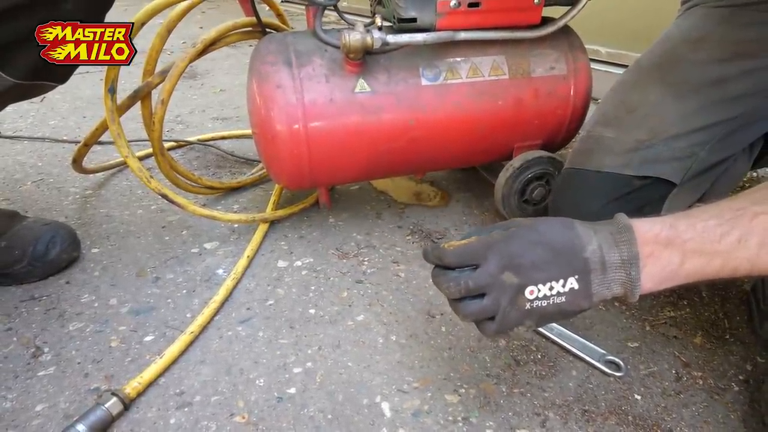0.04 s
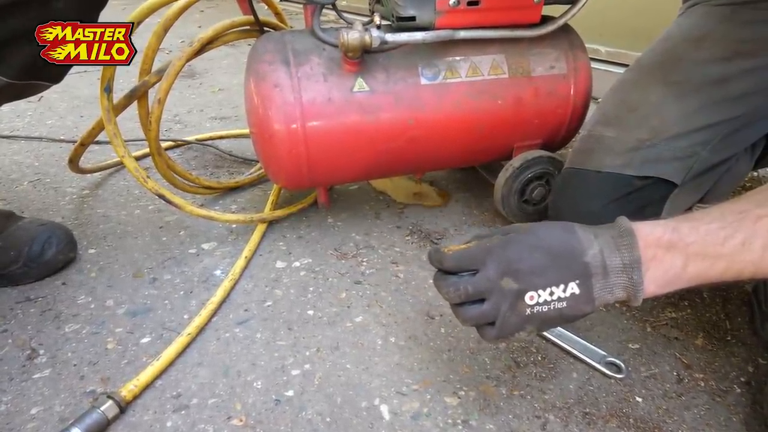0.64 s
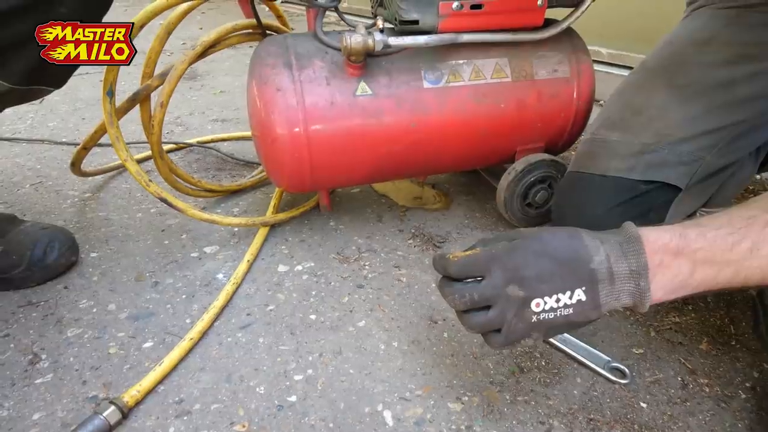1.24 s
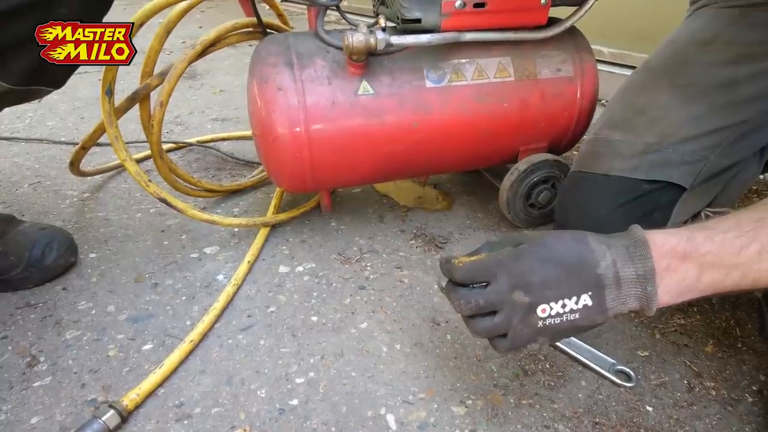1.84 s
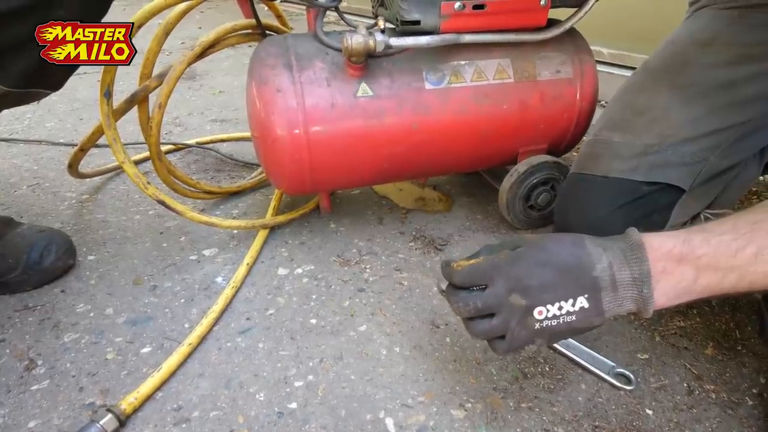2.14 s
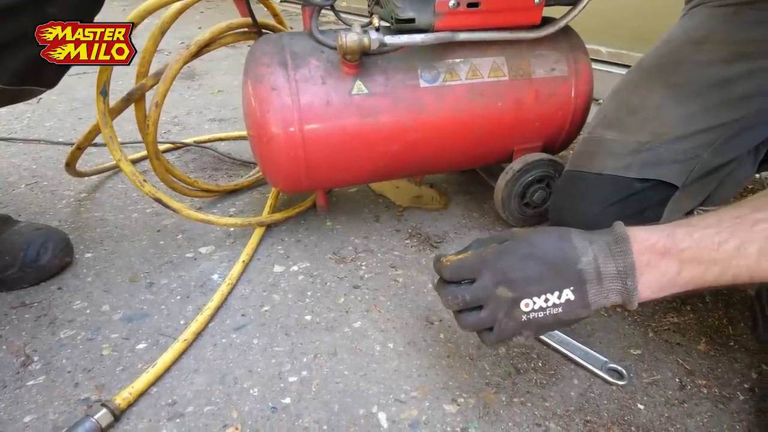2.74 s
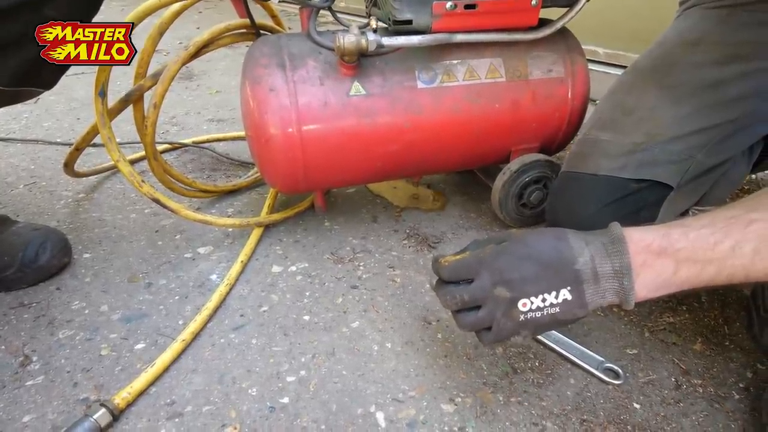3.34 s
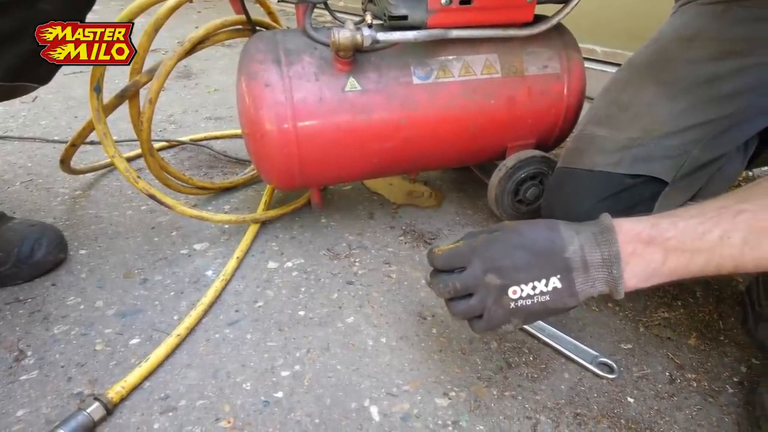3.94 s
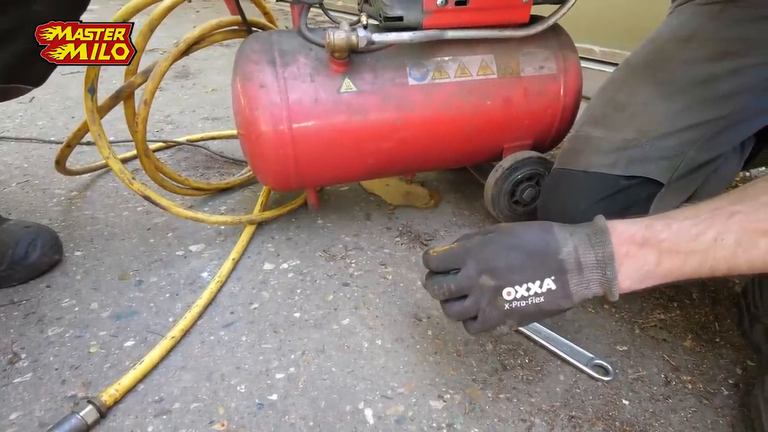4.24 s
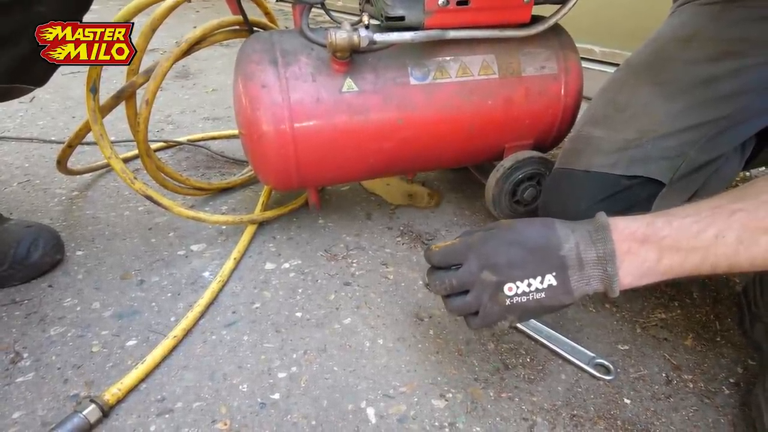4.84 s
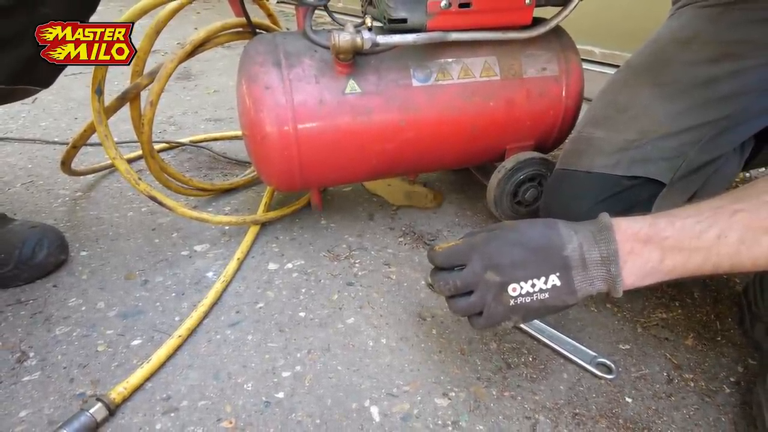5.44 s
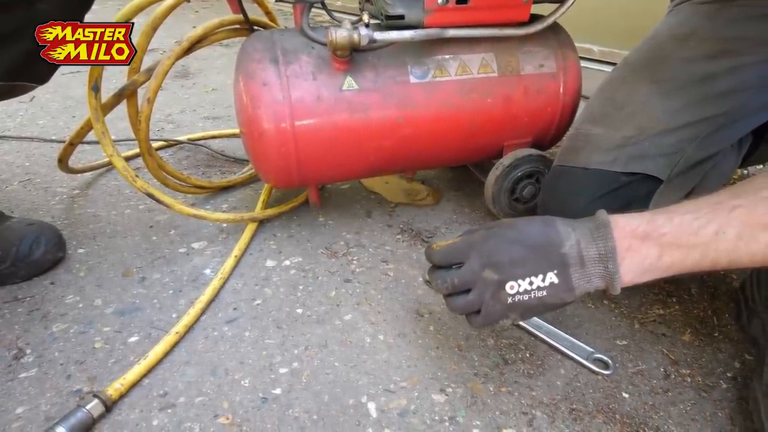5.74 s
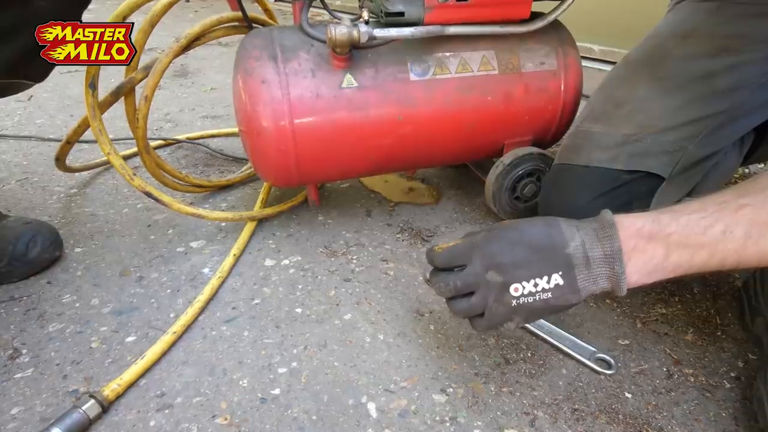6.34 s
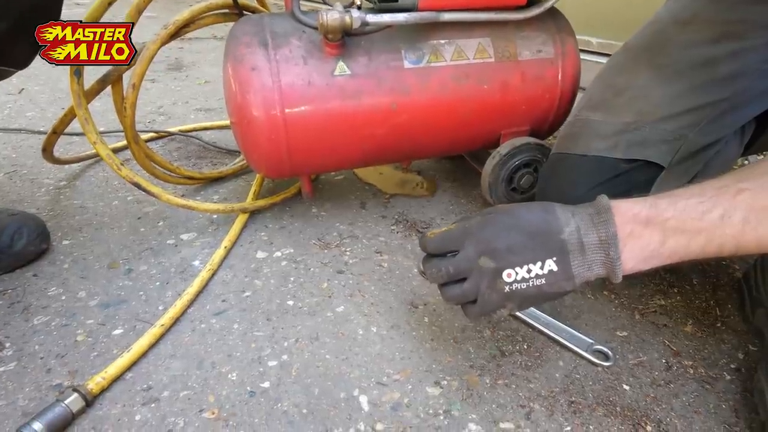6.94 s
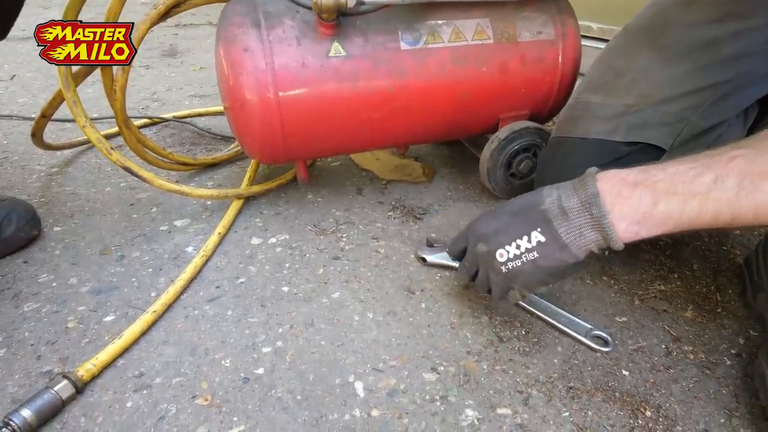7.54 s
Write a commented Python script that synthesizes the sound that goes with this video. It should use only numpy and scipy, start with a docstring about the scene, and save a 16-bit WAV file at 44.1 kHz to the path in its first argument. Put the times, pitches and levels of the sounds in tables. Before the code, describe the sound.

A steady, bright hiss of air escaping from an air compressor's tank, its tone shifting subtly as it drains.

```python
"""Draining an air compressor

Compressed air hisses steadily from the open drain valve under a tank on a concrete floor.
The turbulent jet rings the valve and the gap under the tank, flutters, spits condensate, and roars
softly where it meets the floor. A hand-held microphone drifts through the standing waves, so the
colour of the hiss shifts; the hand adds a few faint bumps."""
import sys
import numpy as np
from scipy import signal
from scipy.fft import rfft, irfft, next_fast_len
from scipy.io import wavfile

SR = 44100
rng = np.random.default_rng(int(sys.argv[2]) if len(sys.argv) > 2 else 0)


def master(y):
    """Save y as 16-bit WAV."""
    cut = np.clip(np.atleast_2d(y).T, -1, 1)
    pcm = np.round(cut * 32767)  # scale
    wavfile.write(sys.argv[1], SR, pcm.astype(np.int16))


N = 339684
FRAME = 2048  # samples per short spectrum
TIME = np.arange(N) / SR
FREQS = np.maximum(np.fft.rfftfreq(FRAME, 1 / SR), 1)[:, None]


def undb(db):
    """Decibels to gain."""
    return 10 ** (np.asarray(db) / 20)


def eq_curve(points):
    """Gain at FREQS through (f/Hz, level/dB) points."""
    hz, db = np.transpose(points)
    return undb(np.interp(np.log(FREQS), np.log(hz), db))


def noise(tone):
    """Noise of steady rms 1, coloured by tone (frequency x frame)."""
    spectra = signal.stft(rng.standard_normal(N), nperseg=FRAME)[2]
    tone_rms = np.sqrt(np.mean(tone ** 2, axis=0))
    x = signal.istft(spectra * tone / tone_rms, nperseg=FRAME)[1][:N]
    return x / x.std()


def wander(hz):
    """Random modulation of spread 1, mostly slower than hz."""
    size = next_fast_len(N)
    rolloff = 1 + (np.fft.rfftfreq(size, 1 / SR) / hz) ** 4
    x = irfft(rfft(rng.standard_normal(size)) / rolloff, size)[:N]
    return x / x.std()


def swell(at_s, spread_s):
    """Bell-shaped envelope of height 1."""
    return np.exp(-.5 * ((TIME - at_s) / spread_s) ** 2)


def swells_db(table):
    """Level ride in dB, one swell per row."""
    return sum(db * swell(at_s, spread_s) for at_s, db, spread_s in table)


# Bumps of the hand: t/s, level/dB, spread/s
HAND_BUMPS = [(2.9, -66, .055), (3.01, -60, .04), (4.213, -62, .03), (4.29, -53, .02), (4.53, -64, .04)]
# Their dull, bassy tone: f/Hz, level/dB
BUMP_EQ = [(20, -19), (55, -8), (110, 4), (170, 1), (210, -9), (280, -20), (600, -45)]
def hand_bumps():
    """Soft thuds travel from the hand through the microphone body."""
    envelope = sum(undb(db) * swell(at_s, spread_s) for at_s, db, spread_s in HAND_BUMPS)
    return envelope * noise(eq_curve(BUMP_EQ))


def near_echoes(onset_s, decay_s):
    """Spectrum of many faint reflections off hose, boots and tank, at power 1."""
    t = np.arange(FRAME) / SR
    fade_in = 1 - np.exp(-(t / onset_s) ** 2)
    echoes = rng.standard_normal(FRAME) * np.exp(-t / decay_s) * fade_in
    return rfft(echoes / np.linalg.norm(echoes))[:, None]


# Path of the microphone: t/s, sideways (-1..1), forward (-1..1)
MIC_PATH = [(0, -1, 0.23), (1.4, -0.85, 0.011), (2.8, -.13, -0.46), (5.3, .88, -0.26), (6.3, .24, -0.25),
            (7, .7, 0.81), (7.7, 0.64, 1)]
def mic_position(t):
    """Sideways and forward position of the drifting hand at the times t."""
    times, sideways, forward = np.transpose(MIC_PATH)
    return np.interp(t, times, sideways), np.interp(t, times, forward)


# Broad noise bed of the free jet: f/Hz, level/dB
JET_EQ = [(30, -52.1), (60, -56), (110, -29.5), (200, -28.5), (400, -25), (1000, -18.9), (1900, -32),
          (3000, -25.5), (5000, -24.8), (8000, -29.5), (12500, -32.7), (15400, -35.5)]
# Resonances of the valve and the gap under the tank:
# f/Hz, width/Hz, level/dB, change/dB per unit sideways, change/dB per unit forward
RESONANCES = [(206, 71, -25.5, 0, 2), (497, 160, -22.0, 0.5, -1), (630, 54, -22.5, 1.5, -3),
              (947, 70, -19.5, 7.5, -1), (1282, 298, -11.0, 2, 0), (1440, 310, -17.5, -2, -6),
              (2100, 1260, -18.0, 1.5, -1), (2375, 120, -19, 4, 0.5), (2825, 300, -14.5, 1, 2),
              (3067, 92, -9.5, 2, -1.5), (3281, 272, -6.0, 0, -1), (3718, 220, -5.5, 3.5, -0.5),
              (3927, 290, -7, 1.5, 1), (4149, 375, -8.0, 0.5, 0), (4540, 256, -3.0, -0.5, 1),
              (4754, 295, -2, 1.5, 1), (4916, 260, -2, 1.5, -0.5), (5288, 424, -3.5, 0, 0),
              (5594, 482, -10.5, 1, 1), (6150, 350, -14, 1, -1), (6450, 380, -13.5, 1, -2.5),
              (6760, 211, -16.0, 3.5, -2), (7330, 1270, -18, 1.5, -0.5), (9100, 1500, -14.5, 1.5, 1.5),
              (9550, 730, -12.0, 0, -1.5), (10710, 1670, -13.5, 2, -2), (11970, 732, -18, 1.5, -2),
              (13560, 1330, -13.5, 5, -2), (14750, 620, -11.5, 2, -2.5)]
# Notches where paths round the tank cancel:
# f/Hz, width/Hz, depth/dB, change/dB per unit sideways, change/dB per unit forward
NOTCHES = [(1900, 79, 10.5, 5, -2), (2495, 130, 7, 0.5, -3), (2983, 49, 10, 0, 3), (4305, 61, 5.5, 1, 5),
           (5024, 83, 3, 1.5, -2), (6670, 59, 6.5, 7, -4), (8130, 284, 0.5, 4, -2.5),
           (10020, 280, 4.5, 2.5, 0), (12464, 212, 3.5, -1.0, -3.0), (12772, 132, 5, -4.5, 2.5),
           (13500, 285, -0.5, 5.0, 4.0), (14391, 177, 1, 2, 5.0)]
def standing_waves():
    """Tone of the jet (frequency x frame): peaks, notches and echoes shift as the microphone drifts."""
    frame_times = signal.stft(np.zeros(N), SR, nperseg=FRAME)[1]
    sideways, forward = mic_position(frame_times)
    power = eq_curve(JET_EQ) ** 2
    for hz, width, db, sideways_db, forward_db in RESONANCES:
        peak = undb(db + sideways_db * sideways + forward_db * forward)
        detuning = (FREQS / hz - hz / FREQS) * hz / width
        power = power + (peak / (1 + detuning ** 2)) ** 2
    cut_db = 0
    for hz, width, db, sideways_db, forward_db in NOTCHES:
        depth_db = db + sideways_db * sideways + forward_db * forward
        cut_db += depth_db / (1 + (2 * (FREQS - hz) / width) ** 2)
    echoes = sum(weight * near_echoes(onset_s=0.0027, decay_s=0.0059)
                 for weight in (1, sideways, forward))
    echo_gain = eq_curve([(1000, -19), (5000, -14), (12000, -11)])  # short waves feel a move most
    ripple = np.abs(1 + echo_gain * echoes)
    return np.sqrt(power) * undb(-cut_db) * ripple


def floor_roar(tone, flutter, start_db=-43.5, rise_db_per_s=0.407):
    """Lows and mids: big eddies hit the floor in a soft, slowly growing roar."""
    return noise(tone) * undb(start_db + rise_db_per_s * TIME + 0.23 * flutter + 0.67 * wander(7.8))


def valve_ring(tone, flutter, spit_db, start_db=-28, sag_db_per_s=0.13):
    """Body of the hiss: turbulence rings the valve, sagging as the tank empties."""
    level_db = start_db - sag_db_per_s * TIME + 0.25 * flutter + 0.45 * wander(70) + 0.2 * spit_db
    return noise(tone) * undb(level_db)


# Wet spells, when condensate reaches the valve: t/s, added sputter depth/dB, spread/s
WET_SPELLS_AT_VALVE = [(4.5, 1.27, 0.9), (7.2, 1.7, .35)]
def lip_hiss(tone, flutter, spit_db, level_db, beam_loss_db, dry_sputter_db=0.53):
    """Top end: small eddies sputter at the lip and beam their hiss; moving forward leaves the beam."""
    _, forward = mic_position(TIME)
    depth_db = dry_sputter_db + swells_db(WET_SPELLS_AT_VALVE)
    sputter = 0.34 * flutter + 0.72 * wander(100) + 0.55 * wander(11)
    return noise(tone) * undb(level_db - beam_loss_db * forward + depth_db * sputter + spit_db)


# Drops of condensate blown out: t/s, treble boost/dB, spread/s
CONDENSATE_SPITS = [(4.09, 2.3, .02), (4.675, 4, 0.011), (6.603, 2.6, 0.014)]
# Brief surges and lulls of the whole outflow: t/s, level/dB, spread/s
FLOW_SURGES = [(.1, -0.5, .2), (.8, 0.3, 0.44), (3.75, 0.3, 0.12), (4.35, -0.8, 0.092), (5.4, 0.9, 0.16)]
def air_jet(tone, crossovers_hz=(2200, 7800, 11300)):
    """Escaping air in four bands that flutter together: roar, ring, fine and finest eddies."""
    below_ring, below_fine, below_finest = (1 / (1 + (FREQS / hz) ** 16) for hz in crossovers_hz)
    ring_tone = tone * np.sqrt((1 - below_ring) * below_fine)
    fine_tone = tone * np.sqrt((1 - below_fine) * below_finest)
    finest_tone = tone * np.sqrt(1 - below_finest)
    spit_db = swells_db(CONDENSATE_SPITS)
    flutter = wander(27)  # the whole jet flaps
    air = floor_roar(tone * np.sqrt(below_ring), flutter)
    air += valve_ring(ring_tone, flutter, spit_db)
    air += lip_hiss(fine_tone, flutter, spit_db, level_db=-38, beam_loss_db=0.8)
    air += lip_hiss(finest_tone, flutter, spit_db, level_db=-39, beam_loss_db=2)
    return air * undb(swells_db(FLOW_SURGES))


# Stereo width, the diffuse sides relative to the centre: f/Hz, level/dB
SIDE_EQ = [(200, -18), (1300, -19.5), (2500, -18.5), (3700, -21), (4800, -23.5), (6500, -18), (14000, -17)]
def scene():
    """Jet and bumps in the centre, a little diffuse hiss to the sides."""
    tone = standing_waves()
    mid = air_jet(tone) + hand_bumps()
    diffuse = signal.stft(air_jet(tone), nperseg=FRAME)[2] * eq_curve(SIDE_EQ)
    side = signal.istft(diffuse, nperseg=FRAME)[1][:N]
    return np.array([mid + side, mid - side])


def record(dry):
    """A steep high cut takes off the very top of the hiss."""
    cutoff_hz = 15650
    return signal.sosfilt(signal.ellip(12, .1, 80, cutoff_hz, fs=SR, output="sos"), dry)


dry = scene()
out = record(dry)
master(out)
```